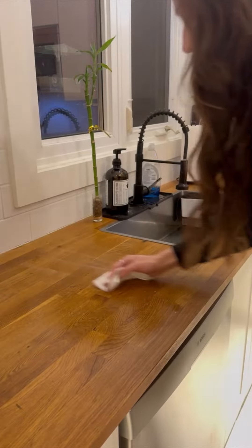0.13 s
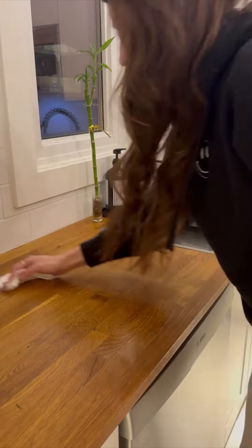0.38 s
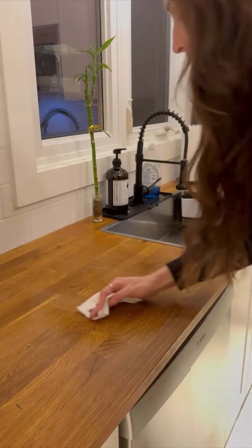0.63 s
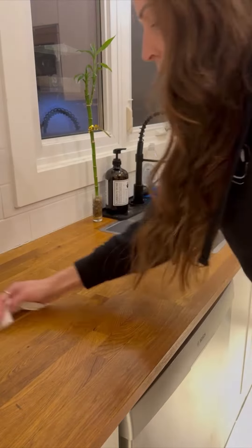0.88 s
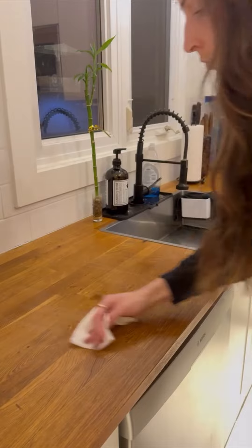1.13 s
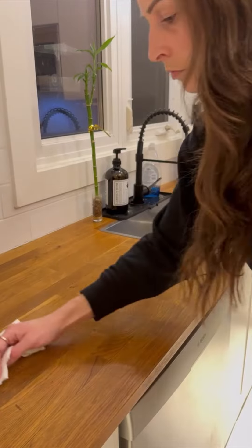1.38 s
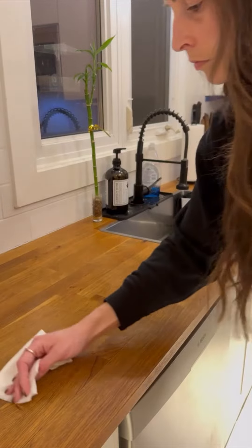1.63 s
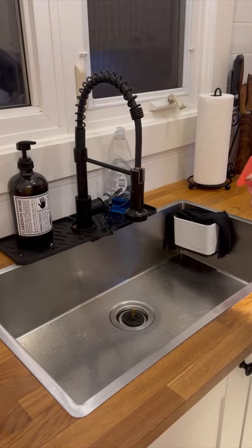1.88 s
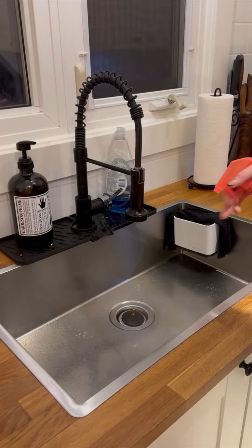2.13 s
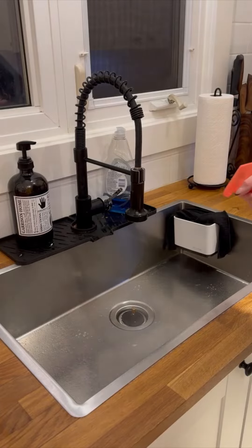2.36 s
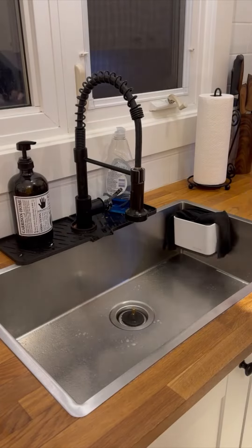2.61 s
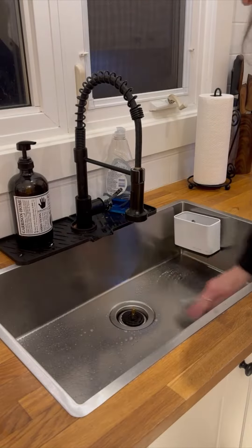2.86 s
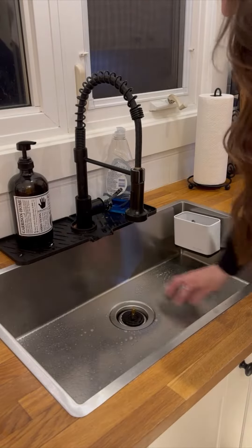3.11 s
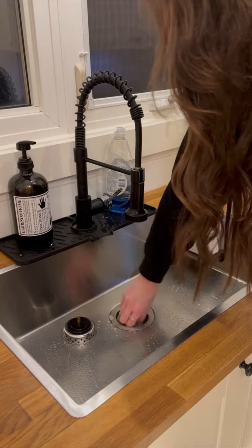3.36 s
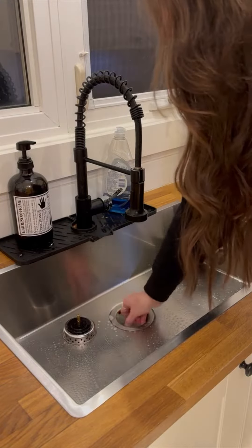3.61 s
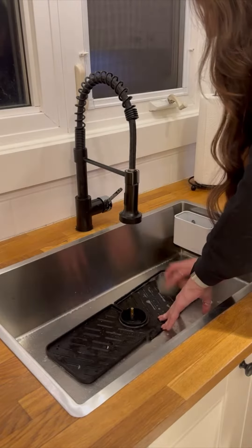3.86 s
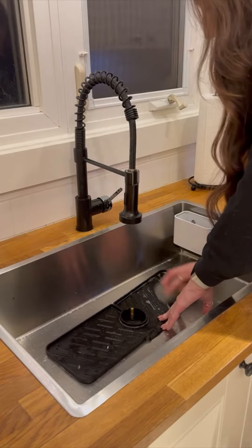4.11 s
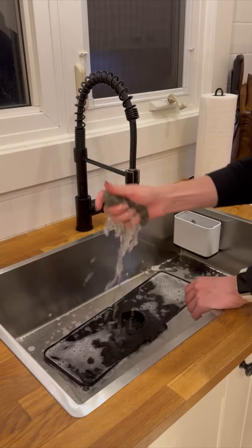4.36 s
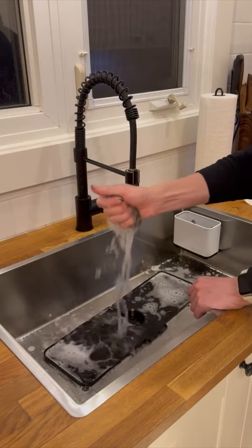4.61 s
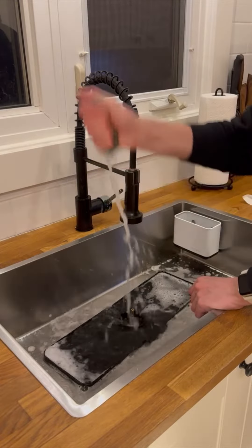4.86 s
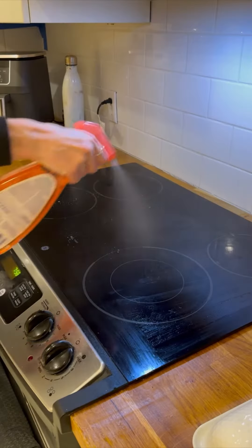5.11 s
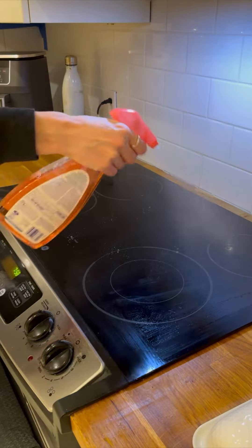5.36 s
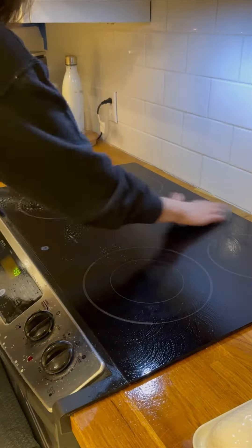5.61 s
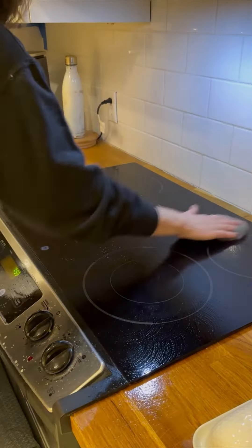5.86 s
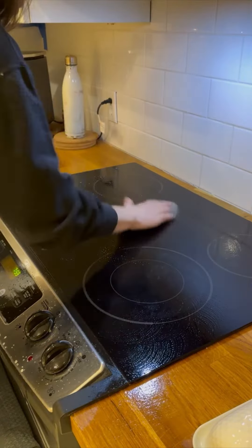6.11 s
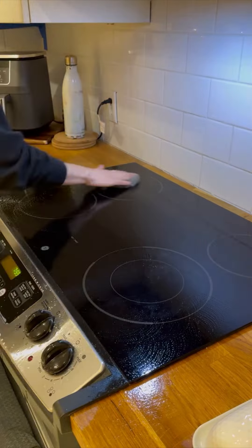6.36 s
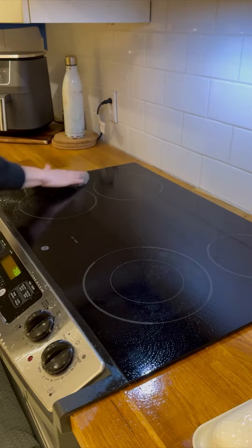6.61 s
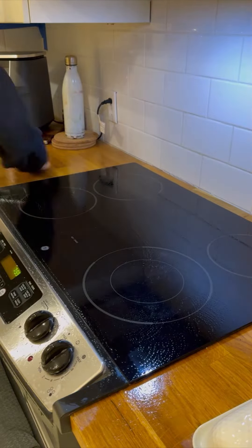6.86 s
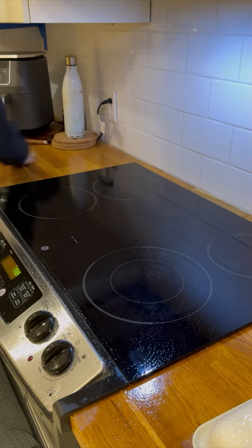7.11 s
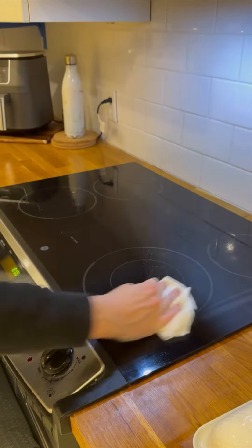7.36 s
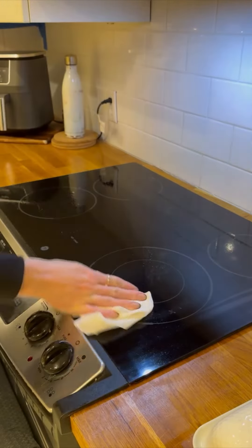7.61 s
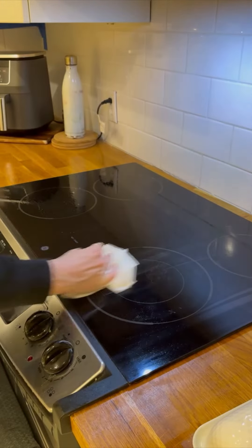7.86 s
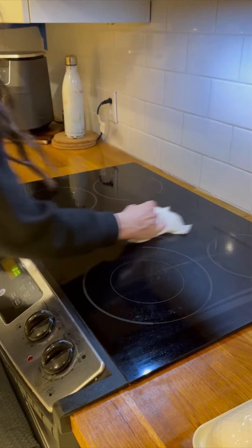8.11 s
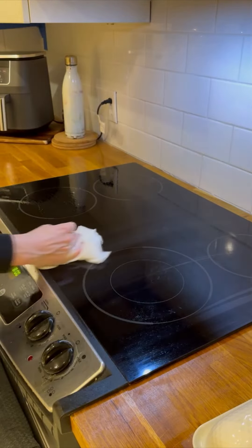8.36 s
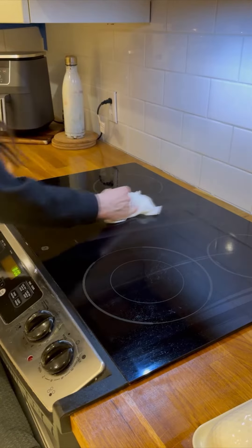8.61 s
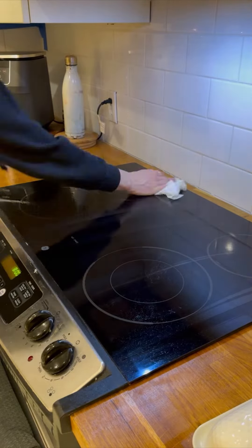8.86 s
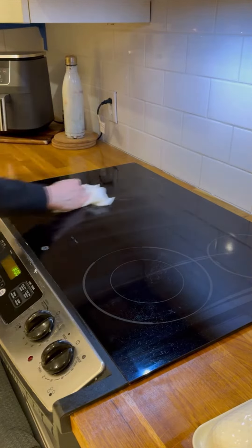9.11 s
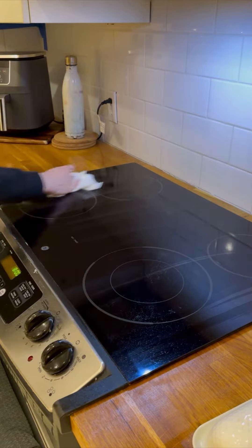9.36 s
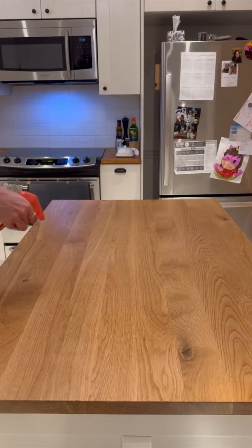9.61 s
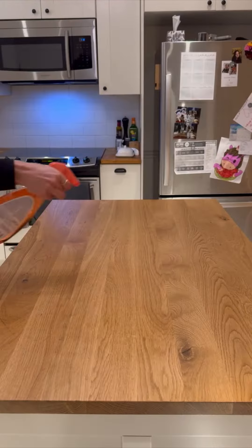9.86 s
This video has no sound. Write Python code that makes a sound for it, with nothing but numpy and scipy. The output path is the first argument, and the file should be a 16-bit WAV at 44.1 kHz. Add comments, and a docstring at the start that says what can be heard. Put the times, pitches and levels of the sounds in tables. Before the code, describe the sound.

Close, dry stereo sound in a small tiled kitchen, chopped by hard cuts over a faint low rumble. From 0 to 1.8 seconds, paper makes broad airy swishes on wood, with gaps, a low drag near 1.1 and a tiny tick at 1.7. Three hissing spray squirts at 1.9-2.6 each end in a sharp plastic snap. At 2.7 a dull double knock rings the steel sink; quick rasping scours follow, then duller rubbing around the drain to 3.8. Hollow mat rubbing and bumps lead to loud, bright water splats at 4.4-5.0, thumping below. Three more squirts and clicks come at 5.05-5.55. Wet pad strokes scratch softly until 6.85, then swell into a forceful scrub peaking at 7.2. From 7.25 to 9.45, paper wiping is very faint, with small scuffs and bumps. Two weaker squirts with clicks finish from 9.5 to 10.

```python
"""Kitchen cleaning in short parts joined by hard cuts. Paper wipes a wooden counter, a trigger bottle sprays,
a scourer works a steel sink and water is wrung into it. Then a glass hob is sprayed, scrubbed, dried with paper
and sprayed again. Rubbing and spray are coloured noise that swells; snaps, knocks, splats and bumps are short
rings and noise bursts; a low rumble lies below. A phone with two close microphone ports listens at arm's length."""
import sys
import numpy as np
from scipy import signal
from scipy.fft import rfft, irfft, next_fast_len
from scipy.io import wavfile
from scipy.ndimage import uniform_filter1d

SR = 44100
rng = np.random.default_rng(int(sys.argv[2]) if len(sys.argv) > 2 else 0)


def generate_wav(sig):
    """Save sig (samples, or channels by samples) to the path in sys.argv[1] as 16-bit PCM at SR."""
    pcm = np.round(np.clip(np.atleast_2d(sig).T, -1, 1) * 32767).astype(np.int16)
    wavfile.write(sys.argv[1], SR, pcm)


def convert_level_to_amplitude(level_db):
    """Map a level in decibels to its linear amplitude factor."""
    exponent = np.asarray(level_db, float) / 20
    return 10 ** exponent


N = 440118

# Edges of the parts: one stops and the next fades in: (time [s])
CUTS = [0, .360, .859, 1.245, 1.832, 2.674, 3.329, 3.815, 4.292, 4.979, 5.593, 6.244, 6.853, 7.2385, 7.627,
        8.037, 8.499, 8.856, 9.182, 9.469, 9.98]
FADE_S = 0.024
# Middle of the band that stands out as paper scrapes wood, one per wood part: (frequency [Hz])
PAPER_POCKET = [1120, 1370, 1040, 940]
# Tone colours of paper, scourer, water, pad and spray: (frequency [Hz], level [dB])
PAPER_ON_WOOD = [(250, -1.5), (400, -1.5), (700, -1), (1100, -3.5), (1700, 1.4), (2500, -0.7), (3600, -2.5),
                 (4700, -5), (6200, -3), (8500, -2), (11500, -6.5), (14000, -8.5), (15600, -5)]
SCOURER_ON_STEEL = [(250, 2), (400, -12.5), (700, -13.5), (1100, -11.5), (1700, -10), (2500, -10.5),
                    (3600, -9.5), (4700, -12), (6200, -5.5), (8500, -5), (11500, -11.5), (14000, -3.5),
                    (15600, -3)]
SCOURER_IN_DRAIN = [(250, 4.5), (400, -9.5), (700, -8.5), (1100, -9), (1700, -10.5), (2500, -12),
                    (3600, -14.5), (4700, -16.5), (6200, -14), (8500, -15), (11500, -16.5), (14000, -15),
                    (15600, -13.5)]
FALLING_WATER = [(250, -1), (400, -0.5), (700, -5.5), (1100, -5.5), (1700, -6), (2500, -2), (3600, -1.5),
                 (4700, -4), (6200, 0.5), (8500, 0.5), (11500, -3), (14000, -2), (15600, 1.5)]
PAD_ON_WET_GLASS = [(250, 11), (400, -9.5), (700, -9), (1100, -11), (1700, -2), (2500, 0.5), (3600, 0),
                    (4700, -3.5), (6200, 0.5), (8500, -2.5), (11500, -10), (14000, -4.5), (15600, -3.1)]
PAD_PRESSED_HARD = [(250, -8), (400, -21), (700, -17.5), (1150, -15), (1450, -3.5), (2200, -1), (3000, -3),
                    (3600, 0.5), (4700, -6), (6200, 1.5), (8500, -4.5), (11500, -8.5), (14000, -4),
                    (15600, -4)]
PAPER_ON_GLASS = [(250, 4.5), (400, -13), (700, -10), (1100, -11.5), (1700, -11.5), (2500, -10),
                  (3600, -12.5), (4700, -15), (6200, -10.5), (8500, -14), (11500, -16), (14000, -16.5),
                  (15600, -16)]
MIST = [(250, -3), (400, -12.5), (700, -8), (1100, -7), (1700, -2), (2500, 1.5), (3600, -3.5), (4700, -5.5),
        (6200, 1), (8500, -3), (11500, -9), (14000, -3.5), (15600, -2)]
# Tone colour of the room rumble: (frequency [Hz], level [dB])
RUMBLE = [(15, -41), (25, -0.5), (64, 0.5), (114, -5.5), (146, -3.5), (233, -3), (352, -10.5), (425, -14),
          (500, -14.5), (650, -19), (1100, -120)]
# Squeezes of the spray bottle: (time of the peak [s], level [dB])
SQUEEZES = [(1.942, -38.5), (2.212, -38.5), (2.487, -39), (5.058, -40), (5.301, -39.5), (5.553, -39.5),
            (9.495, -42), (9.755, -42), (10.0, -48.5)]
JET_RISE_S, JET_FALL_S = 0.054, 0.061
# The trigger snapping back: (time [s], peak [dB], pitch factor [times])
SNAPS = [(2.0927, -22.5, 1.06), (2.373, -22, 0.99), (2.648, -21, 1.08), (5.193, -24.5, 0.85),
         (5.443, -23.5, 0.97), (5.484, -24, 0.376), (9.647, -30.5, 0.84), (9.896, -29, 0.66)]
# Ringing tones of the trigger, before the pitch factor: (frequency [Hz], level [dB], time to fall 60 dB [s])
TRIGGER = [(1190, -13, .012), (1800, -14, .008), (2600, -6, .008), (3650, -4, .007), (4600, -9, .005),
           (5500, 0, .005), (6300, 1, .006), (7500, -1, .004), (8900, -1, .004), (10300, -4, .003),
           (13000, -6, .003)]
# The bottle thumps after each snap; its level counts from that of the snap
BOTTLE_LAG_S, BOTTLE_DB, BOTTLE_HZ = .017, -22.5, 411.5
# Catches of crumpled paper: (time [s], level [dB], length [s])
SCUFFS = [(7.476, -45, 0.019), (7.941, -45.5, 0.071)]
# Soft bumps, two of them water thumping the mat: (time [s], level [dB], frequency [Hz])
THUDS = [(1.042, -48, 150), (1.099, -50, 70), (1.149, -58, 168), (3.375, -37, 61.9), (3.451, -43, 69.6),
         (3.505, -42, 354), (3.679, -55, 194), (3.749, -45, 62), (4.099, -40, 303), (4.206, -31.5, 128),
         (4.245, -33, 101), (4.679, -33, 171), (4.739, -28.5, 171), (5.519, -42, 81.2), (7.17, -40, 248),
         (7.198, -36, 65), (7.498, -44, 245), (7.581, -42.5, 188), (7.959, -45, 132)]
THUD_T60_S = 0.11
# Knocks on the sink bowl: (time [s], peak [dB])
KNOCKS = [(2.682, -27.5), (2.6948, -27.5)]
# Ringing tones of the bowl, bare and with a mat in it, before any damping:
# (frequency [Hz], level [dB], time to fall 60 dB [s])
BOWL = [(94, -3, 0.48), (157, 2, 0.41), (188, -13, 0.33), (246, -11, 0.32), (371, -15, 0.27),
        (432, -21, 0.37), (496, -21, 0.24), (548, -11.5, 0.1), (636, -15, 0.23), (760, -7, 0.084),
        (808, -5, 0.11), (940, -9, .08)]
MAT_IN_BOWL = [(95, -7, 0.33), (117, -6.5, 0.4), (177.2, 1, 0.37), (247, -11, 0.3), (364.6, -6.5, 0.66),
               (430, -7.5, 0.41), (475, -13, 0.31), (611, -9, 0.35), (782, -11, 0.28)]
# Splats of wrung water at set times: (time [s], level [dB], starting pitch of the ring [Hz])
SPLATS = [(4.4127, -29, 2400), (4.4413, -25.5, 8300), (4.4657, -28, 7500), (4.4838, -17, 9400),
          (4.5181, -18, 6300), (4.5311, -14.5, 2410), (4.5473, -19.5, 2430), (4.58, -12.5, 6300),
          (4.599, -21, 2570), (4.6382, -19, 3430), (4.6552, -20, 2920), (4.6788, -17, 8450),
          (4.7357, -19.5, 4970), (4.7703, -14.5, 9050), (4.8366, -26.5, 2860), (4.8587, -17.5, 8740),
          (4.9117, -18, 2920), (4.943, -21, 6410)]
SPLAT_T60_S = 0.029
SMALL_SPLATS, SMALL_DB, SMALL_SPREAD_DB = 20, -29, 4.5  # how many more are scattered, their level, give or take
# Phase by which the right port leads the left: (frequency [Hz], phase [radians])
PORT_PHASE = [(4700, 0), (5400, .4), (6200, .85), (7600, 1.5), (9000, 2.1), (10300, 2.75), (11700, 3.14),
              (13100, 3.45), (14500, 4.1), (15900, 4.55)]
# Sound the two ports do not share: (frequency [Hz], level [dB])
UNSHARED = [(60, -17), (150, -18), (260, -11), (600, -0.5), (1400, -13.5), (2800, -9), (3500, -6.5),
            (4900, -5), (5800, -9), (9500, -10), (11000, -21.5), (12800, -12.5), (13500, -12.5)]
# Tone colour of both ports: (frequency [Hz], level [dB])
PORT_COLOUR = [(20, -32), (45, -0.5), (8500, 0.5), (10400, 6), (11600, -8.5), (13000, 3.5), (14000, 1.5),
               (15800, -0.5), (16050, -48), (16500, -90)]
# The parts in order: (kind of noise [name], its resting level [dB], room rumble [dB])
PARTS = [("wood", -55, -61.5), ("wood", -78, -67), ("wood", -55.5, -76), ("wood", -54.5, -64),
         ("still", -56.5, -68), ("steel", -52.5, -64.5), ("drain", -70, -64), ("drain", -74, -58.5),
         ("water", -54.5, -47.5), ("still", -58.5, -61.5), ("wet", -53, -64), ("wet", -53, -65),
         ("pressed", -55.5, -72.5), ("glass", -59.5, -63), ("glass", -62, -61), ("glass", -65.5, -63.5),
         ("glass", -66.5, -59.5), ("glass", -65, -59), ("glass", -68, -60), ("still", -56.5, -64)]
# Pushes of the hand, strokes, and two wrings of the sponge:
# (time of the peak [s], level [dB], rise [s], fall [s])
STROKES = [(.05, -48, .1, 0.22), (.42, -47.5, 0.083, 0.38), (.89, -51.5, 0.059, .25),
           (2.76, -47.5, .08, 0.11), (2.93, -47.5, 0.067, 0.062), (3.1, -50.5, 0.13, 0.095),
           (3.26, -48.5, 0.099, 0.082), (3.42, -54, 0.072, 0.096), (3.52, -54.5, 0.1, 0.041),
           (3.63, -53.5, 0.041, 0.11), (3.815, -59.5, 0.021, 0.018), (3.875, -66, 0.033, 0.024),
           (3.975, -53.5, 0.038, .055), (4.11, -49.5, 0.055, 0.032), (4.2, -47.5, .035, 0.081),
           (4.62, -39, 0.16, 0.21), (4.88, -48, 0.12, 0.27), (5.66, -55, .05, 0.065),
           (5.78, -52, 0.09, 0.048), (5.95, -51, 0.082, 0.058), (6.1, -51.5, 0.069, 0.092),
           (6.29, -54, 0.045, 0.042), (6.54, -54, 0.045, 0.11), (6.93, -47, 0.065, 0.067),
           (7.07, -36.5, 0.063, 0.14), (7.235, -29, 0.042, .05), (7.55, -65, 0.057, 0.063),
           (7.95, -59, 0.13, 0.14), (8.34, -63, 0.029, 0.092), (8.48, -65, 0.057, .04),
           (8.92, -69, 0.094, 0.052)]
STROKE_EDGE = 2.52  # higher makes a swell flatter on top and steeper at the sides
# Paper on wood: treble tilt added for each dB of loudness, and the level without tilt; softer is brighter
TILT_PER_DB, NO_TILT_AT_DB = -0.04, -39  # dB per octave per dB, dB
# Rubbing, water noise or still room hiss, by name:
# (colour [table], grit [dB], low drumming compared with the strokes [dB])
CONTACTS = {"wood": (PAPER_ON_WOOD, 1.2, -15.5), "steel": (SCOURER_ON_STEEL, 2.1, -18),
            "drain": (SCOURER_IN_DRAIN, 2.7, 0), "water": (FALLING_WATER, 8.5, -1.3),
            "wet": (PAD_ON_WET_GLASS, 2.8, -26), "pressed": (PAD_PRESSED_HARD, 2.7, -28),
            "glass": (PAPER_ON_GLASS, 3.9, 1.5), "still": (PAPER_ON_GLASS, 5.2, 0)}
DRUM_LAG_S, LUMPS_DB, LUMP_S = 0.044, 3, .06  # drumming trails the stroke; the low level wavers this much, this fast
# Low drags of the hand along counter and hob: (time of the peak [s], level [dB], rise [s], fall [s])
DRAG = [(1.12, -53.5, 0.088, 0.16), (7.57, -56, .07, .07)]
DRAG_HZ, DRAG_WIDTH_HZ = 151, 68
# Small ticks on the counter: (time [s], level [dB], frequency [Hz])
TICKS = [(1.724, -38, 1580)]


def evened(x):
    """Scales a sound to an average (rms) level of 1."""
    return x / np.sqrt(np.mean(x ** 2) + 1e-20)


def read(points, hz):
    """Reads a table between its points, with pitch spaced by octaves."""
    f, value = np.transpose(points)
    return np.interp(np.log(hz + 1), np.log(f + 1), value)


def add(mix, s, sound):
    """Mixes a sound in at a time in seconds."""
    part = mix[round(s * SR):][:len(sound)]
    part += sound[:len(part)]


def filtered(x, gain):
    """Makes each frequency louder or softer, as the function gain(hz) says."""
    size = next_fast_len(x.shape[-1] + 2048)
    spectrum = rfft(x, size) * gain(np.fft.rfftfreq(size, 1 / SR))
    return irfft(spectrum, size)[..., :x.shape[-1]]


def rings(modes, damping, pitch=1):
    """A struck object rings in several tones at once, each dying away at its own speed."""
    t = np.arange(SR // 2) / SR
    return sum(convert_level_to_amplitude(db - 60 * t / (t60 * damping)) * np.sin(2 * np.pi * hz * pitch * t) for hz, db, t60 in modes)


def samples(part):
    """Sample numbers of one part."""
    return np.arange(round(CUTS[part] * SR), min(round(CUTS[part + 1] * SR), N))


def swells(rows, lag=0):
    """Strength of pushes that rise, hold and fall; none crosses a cut."""
    power = np.zeros(N)
    for s, db, rise, fall in rows:
        at = samples(min(np.searchsorted(CUTS, s), len(PARTS)) - 1)
        u = at / SR - s - lag
        shape = np.exp(-(abs(u) / np.where(u < 0, rise, fall)) ** STROKE_EDGE)
        power[at] += (convert_level_to_amplitude(db) * shape) ** 2
    return np.sqrt(power)


def gritty_noise(colour, grit_db, bright, patchy_db=2.0, hump_hz=None):
    """Dense tiny bursts of uneven size make a coloured noise, levelled between 1.5 and 7 kHz, then made patchy."""
    count = len(bright)
    sizes = uniform_filter1d(convert_level_to_amplitude(grit_db * np.minimum(rng.exponential(1, count), 5)), size=24)
    bursts = evened(sizes * rng.standard_normal(count))
    hz, t, z = signal.stft(bursts, SR, nperseg=512, noverlap=384)
    hz_column = hz[:, None]
    slope = np.interp(t * SR, np.arange(count), np.clip(bright, -2.5, 2.5))  # dB per octave
    tilt = np.log2((hz_column + 100) / 3500) * slope
    if hump_hz is not None:  # a pocket under the folded paper sings in a broad band
        centre = np.interp(t * SR, np.arange(count), hump_hz)
        tilt += 5 * np.exp(-(np.log2((hz_column + 1) / centre) / .35) ** 2)
    bass_cut = 1 / np.sqrt(1 + (330 / (hz_column + 1)) ** 6)
    gain = convert_level_to_amplitude(read(colour, hz)[:, None] + tilt) * bass_cut
    band = (hz > 1500) & (hz < 7000)
    gain /= np.sqrt((gain[band] ** 2).sum(0) / len(hz))
    patches = uniform_filter1d(rng.standard_normal(z.shape), size=6, axis=0)
    patches = evened(uniform_filter1d(patches, size=12, axis=1))
    return signal.istft(z * gain * convert_level_to_amplitude(patchy_db * patches), SR, nperseg=512, noverlap=384)[1][:count]


def rubbing_water_and_hiss():
    """Each part has its own rubbing or water noise, swelling with pushes; still parts hold a steady room hiss."""
    out, push = np.zeros(N), swells(STROKES)
    for part, (name, rest_db, _) in enumerate(PARTS):
        at, wood = samples(part), name == "wood"
        colour, grit_db, _ = CONTACTS[name]
        level = np.hypot(convert_level_to_amplitude(rest_db), push[at])
        bright = wood * TILT_PER_DB * (20 * np.log10(level) - NO_TILT_AT_DB)
        hump_hz = np.full(len(at), PAPER_POCKET[part]) if wood else None
        out[at] = level * gritty_noise(colour, grit_db, bright, hump_hz=hump_hz)
    return out


def spray():
    """The jet swells, holds and sags with each squeeze; the trigger cracks, bounces once and rattles out."""
    flow = swells([(s, db, JET_RISE_S, JET_FALL_S) for s, db in SQUEEZES])
    out, t = np.zeros(N), np.arange(4000) / SR
    crack = convert_level_to_amplitude(-60 * t / .012)
    bounce = .5 * np.roll(crack, round(.009 * SR))
    rattle = convert_level_to_amplitude(-16 - 60 * t / .1)
    blows = crack + bounce + rattle
    for (s, db, pitch), grit in zip(SNAPS, rng.standard_normal((len(SNAPS), 4000))):
        grit[0] = 2.5  # the first contact is one hard tick
        snap = signal.fftconvolve(blows * grit, rings(TRIGGER, 1, pitch)[:2000])[:4000]
        snap = filtered(snap, lambda hz: 1 / (1 + (800 / (hz + 1)) ** 3))  # the snap carries little bass
        add(out, s, convert_level_to_amplitude(db) * snap / abs(snap).max())
    return out + flow * gritty_noise(MIST, 2.4, np.zeros(N), patchy_db=2.5)


def sink_knocks():
    """A soft hand blow rings the bowl, with the dull slap of the hand itself on top."""
    out, t = np.zeros(N), np.arange(3000) / SR
    for s, db in KNOCKS:
        # the palm lands unevenly: noise around one main push
        slap = filtered(rng.standard_normal(3000), lambda hz: hz > 280) * convert_level_to_amplitude(-24.5 - 60 * t / 0.2)
        slap[round(.012 * SR)] += 1
        push = np.convolve(slap, np.hanning(round(.001 * SR)))
        knock = signal.fftconvolve(rings(BOWL, 1.0), push)
        add(knock, 0, convert_level_to_amplitude(12) * push)
        add(out, s, convert_level_to_amplitude(db) * knock / abs(knock).max())
    return out


def water_splats():
    """Each splat of wrung water is a noisy burst of droplets with a short rising ring."""
    out, t = np.zeros(N), np.arange(3000) / SR
    a, b, c = rng.random((SMALL_SPLATS, 3)).T
    first_s = SPLATS[0][0]
    small_s = first_s + a * (CUTS[9] - first_s)
    small_db = SMALL_DB + SMALL_SPREAD_DB * (2 * b - 1)
    splats = SPLATS + list(zip(small_s, small_db, 2500 * 4 ** c))
    for (s, db, hz), burst in zip(splats, rng.standard_normal((len(splats), 3000))):
        ring = np.sin(2 * np.pi * hz * t * (1 + 6 * t)) * 0.4

        def near_ring(f):  # water colour, softer away from the ring
            return convert_level_to_amplitude(read(FALLING_WATER, f) - 3.5 * abs(np.log2((f + 1) / hz))) * (f > 1500)
        droplets = evened(filtered(burst, near_ring)) * 0.57
        fading = convert_level_to_amplitude(db - 60 * t / SPLAT_T60_S) * np.minimum(t / .0017, 1)
        add(out, s, fading * (ring + droplets))
    return out


def paper_scuffs():
    """Crumpled paper catches briefly: gritty noise that starts fast and dies away."""
    shape = np.zeros(N)
    for s, db, length in SCUFFS:
        u = np.arange(round(3 * length * SR)) / (length * SR)
        add(shape, s, convert_level_to_amplitude(db) * np.minimum(u * 8, 1) * np.exp(-u ** 3))
    return shape * gritty_noise(PAPER_ON_WOOD, 5.8, np.zeros(N))


def thuds():
    """Soft bumps of hand and bottle, and of water thumping the mat: a few fading low cycles with a dull puff."""
    out, t = np.zeros(N), np.arange(6000) / SR
    bumps = THUDS + [(s + BOTTLE_LAG_S, db + BOTTLE_DB, BOTTLE_HZ) for s, db, _ in SNAPS]
    for (s, db, hz), puff in zip(bumps, rng.standard_normal((len(bumps), 6000))):
        dull = evened(filtered(puff, lambda f: (f > 50) / (1 + (f / (4.0 * hz)) ** 3)))
        fading = convert_level_to_amplitude(db - 60 * t / THUD_T60_S) * np.minimum(t * hz, 1)
        add(out, s, fading * (np.sin(2 * np.pi * hz * t) + 0.56 * dull))
    return out


def drag():
    """Counter and hob hum low, a narrow band of noise, while the hand drags along them."""
    hum = filtered(rng.standard_normal(N), lambda hz: 1 / (1 + ((hz - DRAG_HZ) / DRAG_WIDTH_HZ) ** 2))
    return swells(DRAG) * evened(hum)


def counter_ticks():
    """Something small ticks on the counter: one short tone that dies away."""
    out, t = np.zeros(N), np.arange(2000) / SR
    for s, db, hz in TICKS:
        fading = convert_level_to_amplitude(db - 60 * t / 0.025) * np.minimum(t / 0.0022, 1)
        add(out, s, fading * np.sin(2 * np.pi * hz * t))
    return out


def rumble():
    """Room rumble; in the sink the hand drums the bare bowl, then hand and water drum the mat lying in it."""
    low = evened(filtered(rng.standard_normal(N), lambda hz: convert_level_to_amplitude(read(RUMBLE, hz))))
    bumps = rng.standard_normal(N) * rng.exponential(1, N) ** 0.72
    for modes, share, start, end in ((BOWL, .4, CUTS[5], CUTS[7]), (MAT_IN_BOWL, 1.5, CUTS[7], CUTS[9])):
        at = slice(round(start * SR), round(end * SR))
        low[at] += share * evened(signal.oaconvolve(bumps, rings(modes, 0.56))[at])
        low[at] = evened(low[at])
    level, push = np.zeros(N), swells(STROKES, DRUM_LAG_S)
    for part, (name, _, room_db) in enumerate(PARTS):
        at = samples(part)
        level[at] += np.hypot(convert_level_to_amplitude(room_db), convert_level_to_amplitude(CONTACTS[name][2]) * push[at])
    lumps = rng.standard_normal(round(N / SR / LUMP_S) + 2)
    waver = np.interp(np.arange(N) / SR / LUMP_S, np.arange(len(lumps)), lumps)
    return level * convert_level_to_amplitude(LUMPS_DB * waver) * low


def kitchen(x, t60):
    """Tiles and cupboards send sound back as a tail of fading noise, total energy 1."""
    t = np.arange(SR // 2) / SR
    tail = rng.standard_normal(len(t)) * convert_level_to_amplitude(-60 * t / t60) * (t > .003)
    return signal.oaconvolve(x, tail / np.linalg.norm(tail))[:len(x)]


def scene():
    """Part by part: room tail on short sounds, a share unlike at the two ports, a quick fade in and a hard end."""
    steady = rubbing_water_and_hiss() + rumble() + drag() + counter_ticks()
    sudden = spray() + paper_scuffs() + sink_knocks() + water_splats() + thuds()
    out = np.zeros((2, N))
    for start, end in zip(CUTS, CUTS[1:]):
        at = slice(round(start * SR), round(end * SR))
        shared = steady[at] + sudden[at] + convert_level_to_amplitude(-9.0) * kitchen(sudden[at], 0.18)
        unshared = filtered(kitchen(shared, 0.032), lambda hz: convert_level_to_amplitude(read(UNSHARED, hz)))
        # the very first part starts without a fade
        fade = np.minimum(0.013 + np.arange(len(shared)) / (FADE_S * SR), 1) if start else 1
        out[:, at] = fade * np.array([shared + unshared, shared - unshared])
    return out


def low_pass(x):
    """Removes everything above the highest recorded frequency."""
    return signal.sosfilt(signal.butter(12, 16710, fs=SR, output="sos"), x)


def record(dry):
    """The two microphone ports colour the sound alike, but drift apart in phase in the treble."""
    lead = np.array([[-.5j], [.5j]])  # half the phase gap to each side
    ports = filtered(dry, lambda hz: convert_level_to_amplitude(read(PORT_COLOUR, hz)) * np.exp(lead * read(PORT_PHASE, hz)))
    return low_pass(ports)


dry = scene()
out = record(dry)
generate_wav(out)
```